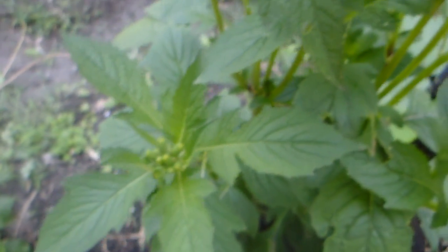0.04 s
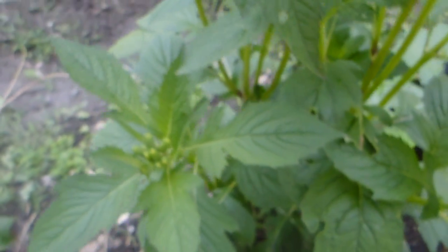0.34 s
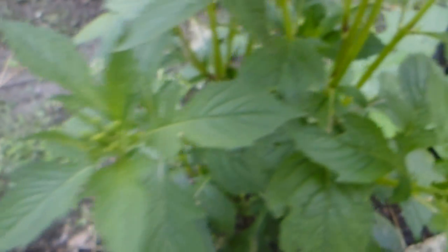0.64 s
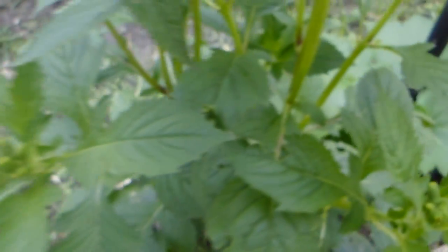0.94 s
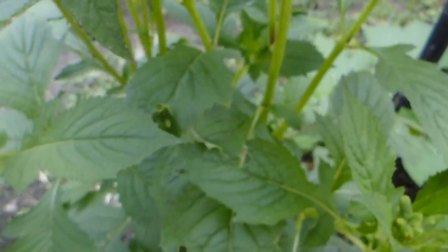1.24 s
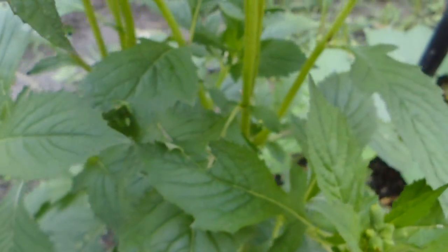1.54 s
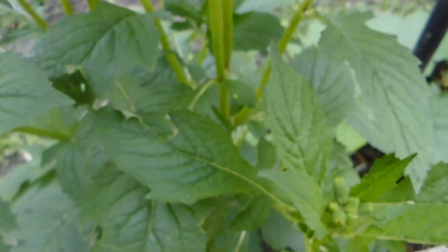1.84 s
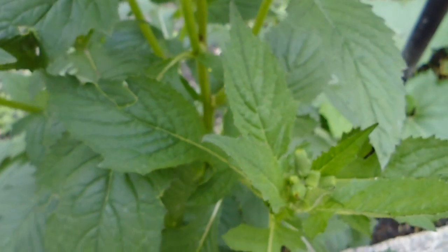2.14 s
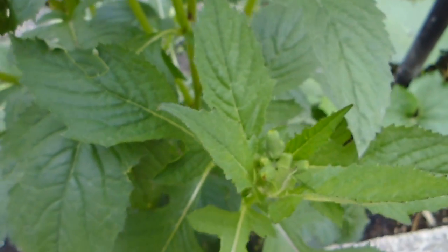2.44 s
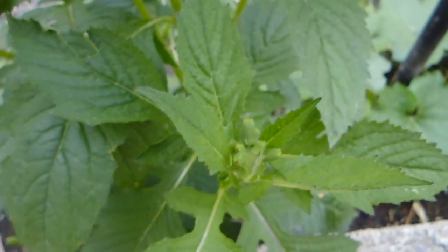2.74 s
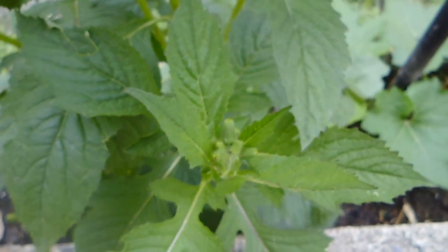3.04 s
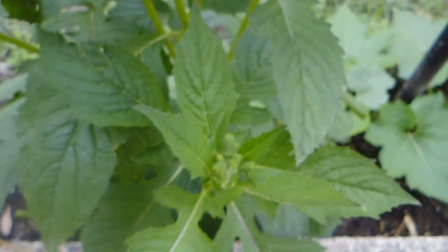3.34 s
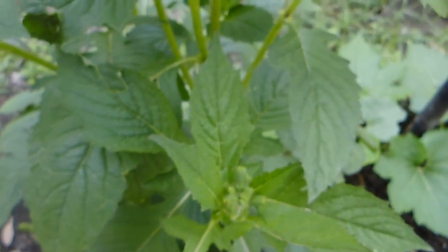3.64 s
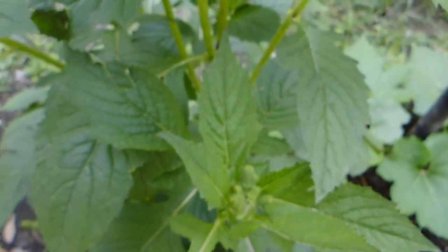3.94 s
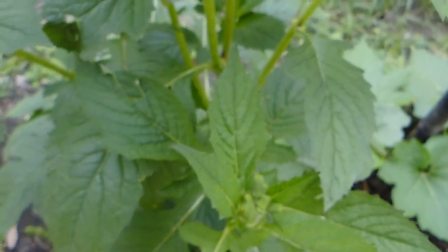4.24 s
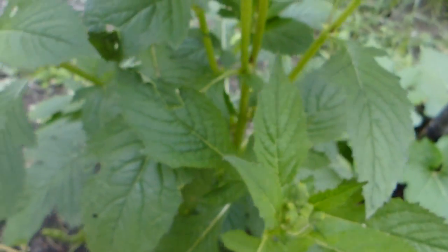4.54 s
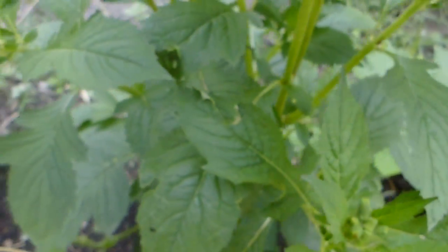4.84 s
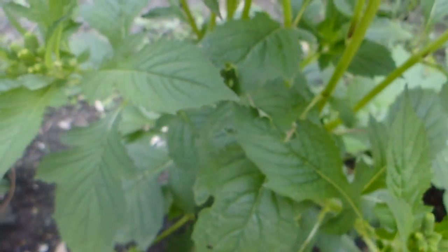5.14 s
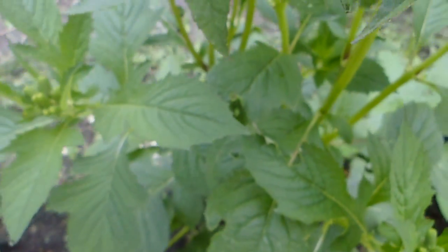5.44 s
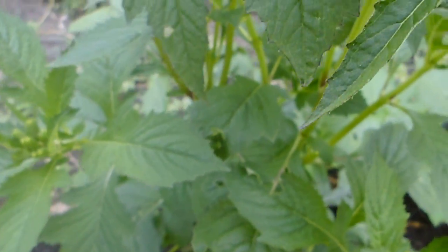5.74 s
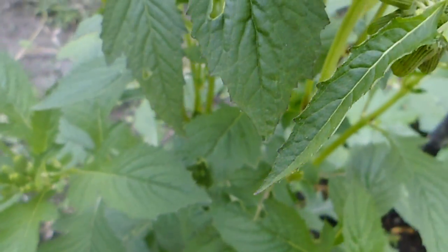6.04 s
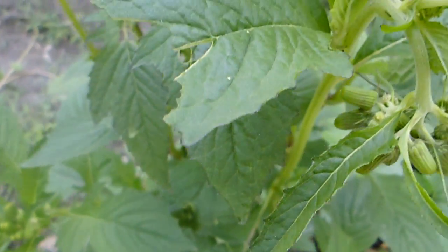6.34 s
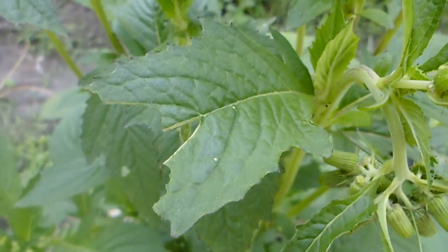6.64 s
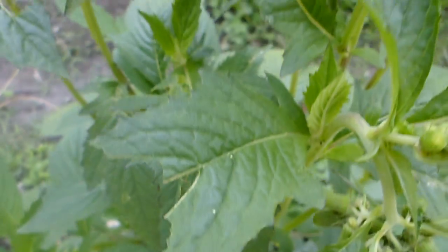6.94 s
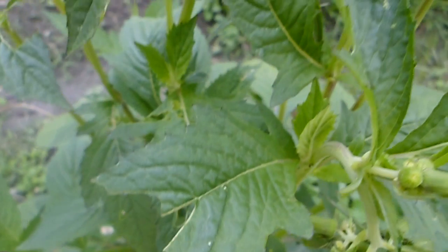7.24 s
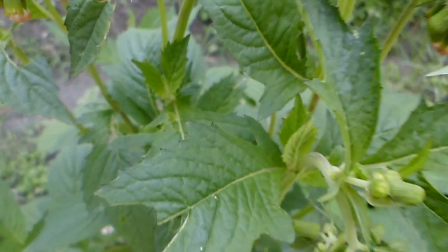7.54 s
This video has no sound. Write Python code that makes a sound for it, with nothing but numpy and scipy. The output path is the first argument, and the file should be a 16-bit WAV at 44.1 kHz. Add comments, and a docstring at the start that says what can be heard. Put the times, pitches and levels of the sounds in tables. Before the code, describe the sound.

Short falling chirps, a hoarse squawk and faint peeps sound over low traffic and fan hum, the sound cutting out twice.

```python
"""Birds in a town garden

Near the microphone one bird whistles two pairs of falling chirps and another gives a hoarse two-part
squawk; others peep far off. Walls and shrubs scatter the calls. Behind them the town roars softly,
a fan unit hums, one vehicle pulls away and another drones closer with its tyre noise.
The recorder cuts out twice, once coming back with a tick."""
import sys
import numpy as np
from scipy import signal
from scipy.fft import rfft, irfft
from scipy.io import wavfile
from scipy.ndimage import uniform_filter1d

SR = 44100
rng = np.random.default_rng(int(sys.argv[2]) if len(sys.argv) > 2 else 0)


def dump_mix(stems):
    """Bounce the given channels to the path in sys.argv[1] as a 16-bit WAV at rate SR."""
    frames = np.atleast_2d(stems).T  # one column per channel
    limited = np.clip(frames, -1, 1)  # hard clip at full scale
    pcm = np.round(limited * 32767).astype(np.int16)
    wavfile.write(sys.argv[1], SR, pcm)


N = 335160
TIME = np.arange(N) / SR
FREQS = np.fft.rfftfreq(N, 1 / SR)


def gain_of(db):
    """Decibels to amplitude."""
    return 10 ** (np.asarray(db) / 20)


def unit_rms(x):
    """Scales to rms 1."""
    return x / np.sqrt(np.mean(x ** 2) + 1e-20)


def follow(rows):
    """Each column of a timed table as a curve over the scene."""
    times, *columns = np.transpose(rows)
    return [np.interp(TIME, times, column) for column in columns]


def held(start, end, rise_s, fall_s):
    """Envelope in dB: 0 from start to end, 10 lower for each rise_s before or fall_s after."""
    return -10 * (np.maximum(start - TIME, 0) / rise_s + np.maximum(TIME - end, 0) / fall_s)


def add(mix, start, sound):
    """Mixes a sound in, start seconds into the scene."""
    part = mix[round(start * SR):][:len(sound)]
    part += sound[:len(part)]


def noise(spectrum):
    """Noise of rms 1; the spectrum's levels set only its colour."""
    hz, db = np.transpose(spectrum)
    f = FREQS + 1e-3
    colour = gain_of(np.interp(np.log(f), np.log(hz), db)) * np.minimum(f / hz[0], 1) ** 2
    return unit_rms(irfft(rfft(rng.standard_normal(N)) * colour, N))


def wander(rate_hz):
    """Smooth random drift of rms 1, up to about rate_hz."""
    lowpass = np.exp(-(FREQS / rate_hz) ** 2) * (FREQS > 0)
    return unit_rms(irfft(rfft(rng.standard_normal(N)) * lowpass, N))


def phase(hz):
    """Running phase of a pitch curve, from a random start."""
    return 2 * np.pi * (np.cumsum(hz) / SR + rng.random())


# Colour of the town, all around the garden: f/Hz, level/dB
TOWN_SPECTRUM = [(200, 0), (380, 2), (500, -1), (780, 0), (1250, -1.5), (1600, -5.5), (2200, -12),
                 (3100, -8.5), (3600, -15.5), (4200, -16.5), (5200, -14), (6100, -19), (7300, -20),
                 (8000, -40.5)]
# Its level in the mix, lower after each dropout: t/s, level/dB
TOWN_LEVEL = [(0, -39), (1.15, -38.5), (1.28, -48.5), (1.85, -49.5), (2.6, -46), (4.4, -43), (6.7, -41),
              (7.0, -47)]

def town():
    """The soft, slightly wavering roar of the town."""
    roar_db, = follow(TOWN_LEVEL)
    return noise(TOWN_SPECTRUM) * gain_of(roar_db + .5 * wander(6.8))


def town_swing_db():
    """How far the town's roar stands above its mean level."""
    roar_db, = follow(TOWN_LEVEL)
    return roar_db - roar_db.mean()


# Colour of streets far from the garden: f/Hz, level/dB
STREET_SPECTRUM = [(28, -8.5), (45, -5.5), (90, 0.5), (125, 2.5), (150, 3.5), (185, -1.5), (230, -3.5),
                   (300, -25), (600, -56)]

def streets():
    """A low murmur that faintly follows the town's roar."""
    return noise(STREET_SPECTRUM) * gain_of(-41.5 + .22 * town_swing_db() + .44 * wander(15))


# Colour of tyres out on the road: f/Hz, level/dB
TYRE_SPECTRUM = [(250, -3), (450, 0), (700, -8), (950, -6.5), (1150, -2), (1300, 6.5), (1480, -8.5),
                 (1750, -5), (1880, -9.5), (2000, -5.5), (2300, -13), (3500, -20), (6000, -45.5)]

def tyres():
    """Tyre noise swells and fades with distance, over a floor that steps up at the second dropout."""
    nearest_s, half_pass_s = 5.93, .84
    relative_distance = np.hypot(1, (TIME - nearest_s) / half_pass_s)
    passing_db = -41 - 27.5 * np.log10(relative_distance)
    floor_db = np.where(TIME < RECORDER_GAPS[1][0], -59, -45.5)
    return noise(TYRE_SPECTRUM) * gain_of(np.maximum(passing_db, floor_db) + .9 * wander(14))


# Tones of the fan unit behind the birds: f/Hz, level/dB
FAN_TONES = [(30, -56), (39.5, -48.5), (57, -47), (73, -53.5), (113.5, -47), (170.5, -47), (700, -62),
             (757, -61.5), (818, -61.5), (877, -53), (1000, -55)]
# Colour of its sizzle: f/Hz, level/dB
SIZZLE_SPECTRUM = [(4300, -23.5), (5000, -7.5), (5450, 2), (5750, -8), (6100, -20.5), (6800, -16.5),
                   (7000, 0), (7150, -8), (7800, -28.5)]

def fan():
    """Wavering motor hum and blade whine with a thin sizzle; the level follows the town's roar."""
    hum = np.zeros(N)
    for hz, db in FAN_TONES:
        level = np.sqrt(2) * gain_of(db + 1.8 * wander(4.2))
        drift_hz = (.38 + .00055 * hz) * wander(6.9)
        hum += level * np.sin(phase(hz + drift_hz))
    sizzle = gain_of(-67) * noise(SIZZLE_SPECTRUM)
    return gain_of(.48 + .65 * town_swing_db()) * (hum + sizzle)


# Engine drawing nearer to the garden: t/s, cycle rate/Hz, boom level/dB, exhaust throb level/dB
ENGINE_COURSE = [(0, 36.1, -48, -45), (.9, 36.1, -50, -43), (1.4, 36.2, -57, -49), (2.9, 36.4, -53, -49),
                 (3.4, 36.5, -47, -46), (4.7, 36.6, -46.5, -44), (5.5, 34.9, -46.5, -49),
                 (6.65, 34.8, -32.5, -48), (7.0, 35, -41.5, -44), (7.6, 35, -38.5, -39)]
# Resonance of its silencer: t/s, f/Hz
SILENCER_RESONANCE = [(0, 250), (3.3, 239.5), (4.2, 237.5), (5.4, 252), (6.7, 238), (7.1, 226.4),
                      (7.6, 208)]

def approaching_engine():
    """Engine orders boom where they meet the silencer's resonance, over the second order's throb."""
    cycle_hz, boom_db, throb_db = follow(ENGINE_COURSE)
    centre_hz, = follow(SILENCER_RESONANCE)
    width_hz, leak_db, pulse_period_s = 26, -26.5, .49
    depth_db = 5 * np.clip((5.2 - TIME) / .65, 0, 1)  # pulses far off, steadies as it comes close
    pulse_db = depth_db * np.cos(2 * np.pi * (TIME - 3.85) / pulse_period_s)
    turn = phase(cycle_hz * (1 + .0021 * wander(5.8)))
    boom = np.zeros(N)
    for order in range(4, 22):
        resonance = 1 / (1 + ((order * cycle_hz - centre_hz) / width_hz) ** 2)
        level = np.maximum(resonance, gain_of(leak_db)) * gain_of(2 * wander(4.2))
        boom += level * np.sin(order * turn + rng.uniform(0, 2 * np.pi))
    throb = gain_of(throb_db) * np.sin(2 * turn)
    return np.sqrt(2) * (gain_of(boom_db + pulse_db) * boom + throb)


# Vehicle pulling away, a row for each push of the throttle: start/s, end/s, level/dB, 10 dB rise/s
THROTTLE_SURGES = [(1.821, 2.168, -30.5, 0.2), (2.346, 2.417, -29.5, 0.37), (2.98, 3.249, -41, 0.5)]

def departing_engine():
    """A deep exhaust note that climbs steadily and swells with each push of the throttle."""
    firing_hz, climb_hz_per_s = 61, 17.5
    turn = phase(firing_hz + climb_hz_per_s * (TIME - THROTTLE_SURGES[0][0]))
    surges_db = [db + held(start, end, rise_s, fall_s=.075) for start, end, db, rise_s in THROTTLE_SURGES]
    exhaust = np.sin(turn) + gain_of(-32.5) * np.sin(2 * turn)
    return np.sqrt(2) * gain_of(np.max(surges_db, axis=0)) * exhaust


# Ticks and rustles in the garden's foliage: t/s, level/dB, 60 dB decay/s
LEAF_RUSTLES = [(2.59, -60, 0.54), (2.633, -51.5, .04), (2.69, -58, 0.49), (4.464, -44.5, .13),
                (6.687, -47, 0.027)]
# Colour of dry leaves: f/Hz, level/dB
LEAF_SPECTRUM = [(1500, -9.5), (3500, -2), (4850, 0), (5600, -4), (8000, -26.5)]

def leaves():
    """Each tick or rustle is a dying puff of bright noise."""
    puffs = sum(gain_of(db + held(t, t, rise_s=.012, fall_s=t60 / 6)) for t, db, t60 in LEAF_RUSTLES)
    return puffs * noise(LEAF_SPECTRUM)


def scatter(call, t60):
    """Leaves and fences return a dense spray of echoes that dies faster in the treble."""
    t, echoes_per_s = TIME[:SR], 3000
    taps = rng.choice([-1., 1.], SR) * (rng.random(SR) < echoes_per_s / SR)
    low = signal.sosfiltfilt(signal.butter(6, 3350, fs=SR, output="sos"), taps)
    tail = low * gain_of(-60 * t / t60) + (taps - low) * gain_of(-60 * t / (.77 * t60))
    return signal.fftconvolve(call, tail / np.linalg.norm(tail))[:N]


# Reflections reaching the microphone after the direct call: delay/s, relative level/dB
WALL_ECHOES = [(.006, -4), (0.012, -23.5), (0.022, -1.5), (.053, -38.5), (.088, -13), (0.116, -11.5)]

def with_walls(call):
    """The direct call plus single echoes from the ground and house walls."""
    out = call.copy()
    for delay, db in WALL_ECHOES:
        add(out, delay * rng.uniform(1, 1.02), gain_of(db) * call)
    return out


def whistle(hz, db, rough, octave_db):
    """A bird's near-sine with a faint octave; rough is its pitch jitter as a share of the pitch."""
    jitter = unit_rms(uniform_filter1d(rng.standard_normal(len(hz)), size=40))
    turn = phase(hz * (1 + rough * jitter))
    return np.sqrt(2) * gain_of(db) * (np.sin(turn) + gain_of(octave_db) * np.sin(2 * turn))


# Peeps far from the microphone: t/s, length/s, start f/Hz, end f/Hz, level/dB
FAR_PEEPS = [(1.492, 0.028, 2387, 2200, -59.5), (1.822, 0.032, 2570, 2320, -51),
             (2.232, 0.042, 2520, 2230, -48.5), (2.378, 0.026, 2480, 2530, -48),
             (2.41, 0.037, 2280, 2115, -49), (2.487, 0.017, 1440, 1510, -44),
             (2.702, .02, 2500, 2400, -48.5), (2.866, 0.016, 2510, 2254, -48),
             (2.892, 0.012, 2430, 2080, -46.5), (2.968, .014, 2530, 2200, -46),
             (2.982, 0.049, 3070, 2410, -49.5), (3.028, 0.027, 2510, 2220, -45)]
# Calls from far trees, heard only as echo: t/s, length/s, start f/Hz, end f/Hz, level/dB
TREE_CALLS = [(.24, 0.085, 4350, 3650, -49.5), (1.62, 0.12, 3700, 2900, -57.5),
              (1.82, 0.06, 3720, 2900, -56), (2.58, 0.15, 4090, 2700, -55), (3.01, 0.046, 4370, 4050, -57),
              (3.71, 0.1, 2910, 3220, -48), (4.38, .17, 3230, 3155, -47.5), (5.5, .2, 2700, 2595, -54.5),
              (5.78, 0.47, 1740, 1733, -49.5), (6.0, 0.2, 2670, 2570, -48.5), (6.38, 0.29, 3230, 3160, -44)]

def far_birds(notes, rough):
    """Short whistles that slide from one pitch to another."""
    out = np.zeros(N)
    for start, length, start_hz, end_hz, db in notes:
        hz = np.linspace(start_hz, end_hz, round(length * SR))
        add(out, start, whistle(hz, db, rough, octave_db=-28.5) * signal.windows.tukey(len(hz), .6))
    return out


# Syllables of the hoarse bird in the garden: t/s, length/s, start f/Hz, level/dB
SQUAWK_SYLLABLES = [(3.78, 0.023, 2264, -46), (3.867, 0.025, 1930, -27.5), (3.963, 0.1, 1890, -28)]
# Colour of its throat: f/Hz, level/dB
THROAT_SPECTRUM = [(800, -42.5), (1130, -23), (1350, -15.5), (1750, -2.5), (2120, 2), (2450, -2),
                   (2900, 0.5), (3350, -12.5), (3900, -22), (4600, -15), (5500, -5.5), (6500, -5),
                   (7400, -21), (8200, -38)]

def squawking_bird():
    """A thin squeak, then a rising whistle that breaks into a fluttering rasp and a second voice."""
    out = np.zeros(N)
    throat = noise(THROAT_SPECTRUM) * gain_of(.69 * wander(180))
    waver = 1 + .01 * wander(400)
    scoop_hz, scoop_s, clear_s, squeak_hz = 270, .036, .04, 6530
    breakup_db_per_s, growth_db_per_s = 120.5, 15
    for start, length, start_hz, db in SQUAWK_SYLLABLES:
        end = start + length
        age = np.maximum(TIME - start, 0)
        breakup_s = np.maximum(age - clear_s, 0)  # the whistle holds clear, then gives way
        hz = start_hz + scoop_hz * (1 - np.exp(-age / scoop_s))

        rasp_db = db - 3.5 + held(start + .005, end, rise_s=.033, fall_s=.022)
        rasp_db += growth_db_per_s * np.minimum(age, length)
        turn = phase(hz * .535 * waver)  # the second voice lies nearly an octave down
        odd_harmonics = sum(np.sin(k * turn) for k in (1, 3, 5))
        second_voice = gain_of(rasp_db - 11) * np.minimum(age / clear_s, 1) * odd_harmonics

        squeak_db = db - 13 + held(start, start + .009, rise_s=.033, fall_s=.007)
        squeak = whistle(np.full(N, squeak_hz), squeak_db, rough=.011, octave_db=-62)

        tone_db = db + held(start, end, rise_s=.0082, fall_s=.007) - breakup_db_per_s * breakup_s
        rough = .0067 + .3 * np.minimum(breakup_s, length)
        tone = whistle(hz, tone_db, rough, octave_db=-32)
        out += squeak + tone + gain_of(rasp_db) * throat + second_voice
    return out


# The bird nearest the microphone: t/s, length/s, low note f/Hz, level/dB, roughness, octave level/dB
NEAR_CHIRPS = [(0.516, 0.056, 2943, -29, 0.14, -20.5), (0.737, 0.051, 2894, -25.5, 0.09, -32),
               (5.01, 0.048, 2763, -32.5, 0.11, -27.5), (5.208, 0.06, 2972, -32.5, 0.12, -36)]

def chirping_bird():
    """Each chirp hooks up to a top note, then turns raspy as it drops to a louder low one."""
    out = np.zeros(N)
    top_hz = 3570
    hook_end, drop_at, drop_width = .16, .45, .05  # shares of the chirp's length
    for start, length, low_hz, db, rough, octave_db in NEAR_CHIRPS:
        progress = np.linspace(0, 1, round(length * SR))
        hook = np.maximum(1 - progress / hook_end, 0)
        top = .5 - .5 * np.tanh((progress - drop_at) / (2 * drop_width))
        breaking = 1 - (2 * top - 1) ** 2  # peaks midway through the drop
        hz = low_hz + (top - .5 * hook) * (top_hz - low_hz)
        shape_db = -17.5 * hook - 5.5 * top - 4 * breaking
        chirp = whistle(hz, db + shape_db, rough * (.38 + .52 * breaking), octave_db)
        add(out, start, chirp * signal.windows.tukey(len(hz), .15))
    return out


def scene():
    """One microphone in the garden: birds at three distances over the hum of the town."""
    chirps, squawk = chirping_bird(), squawking_bird()
    peeps = far_birds(FAR_PEEPS, rough=.05)
    birds = scatter(far_birds(TREE_CALLS, rough=.048), t60=.55)
    birds += gain_of(-1) * with_walls(chirps) + gain_of(-5) * scatter(chirps, t60=.68)
    birds += squawk + gain_of(-8.5) * scatter(squawk, t60=.62)
    birds += gain_of(-.5) * peeps + gain_of(-3) * scatter(peeps, t60=.32)
    background = leaves() + town() + tyres() + streets() + fan()
    return (birds + background + approaching_engine() + departing_engine())[None]


# Resonances of the microphone: f/Hz, width/Hz, gain/dB
MIC_RESONANCES = [(4080, 1200, 0), (4920, 280, 1), (5480, 410, 3), (6990, 44, 5)]
# Dropouts of the recorder: start/s, end/s
RECORDER_GAPS = [(1.1532, 1.2808), (6.722, 6.9765)]
# Ring of the tick as the sound returns: f/Hz, level/dB, 60 dB decay/s
TICK_MODES = [(2710, -37, 0.031), (4240, -38.5, 0.022), (4942, -34.5, 0.029)]

def record(dry):
    """Microphone colour, two dead gaps, a ringing tick where the first ends, and a treble cut-off."""
    colour_db = sum(db / (1 + (2 * (FREQS - hz) / width) ** 2) for hz, width, db in MIC_RESONANCES)
    out = irfft(rfft(dry[0]) * gain_of(colour_db), N)
    for start, end in RECORDER_GAPS:
        out *= (TIME < start) | (TIME > end)
    t = TIME[:SR // 10]
    ring = sum(gain_of(db - 60 * t / t60) * np.sin(2 * np.pi * hz * t) for hz, db, t60 in TICK_MODES)
    click = gain_of(-39.5 - 60 * t / .0089) * rng.standard_normal(len(t))
    add(out, RECORDER_GAPS[0][1], ring + click)
    lowpass = signal.firwin(301, cutoff=8150, window=("kaiser", 9), fs=SR)
    return signal.oaconvolve(out, lowpass, "same")[None]


dry = scene()
out = record(dry)
dump_mix(out)
```